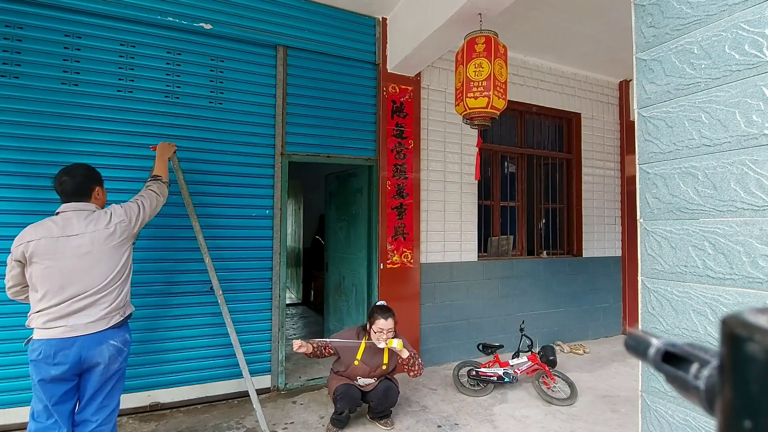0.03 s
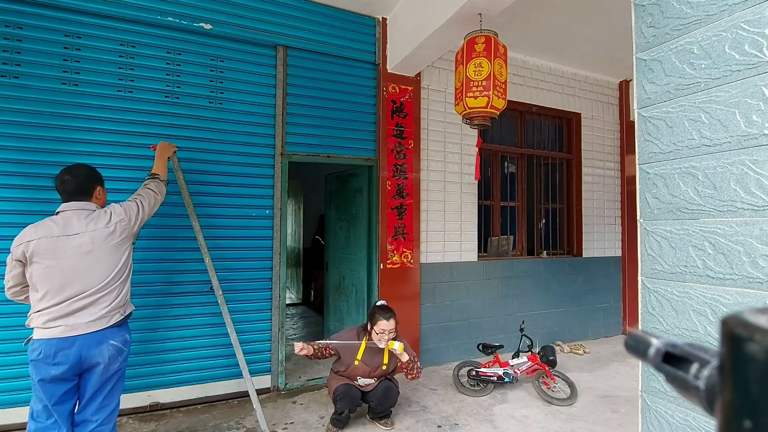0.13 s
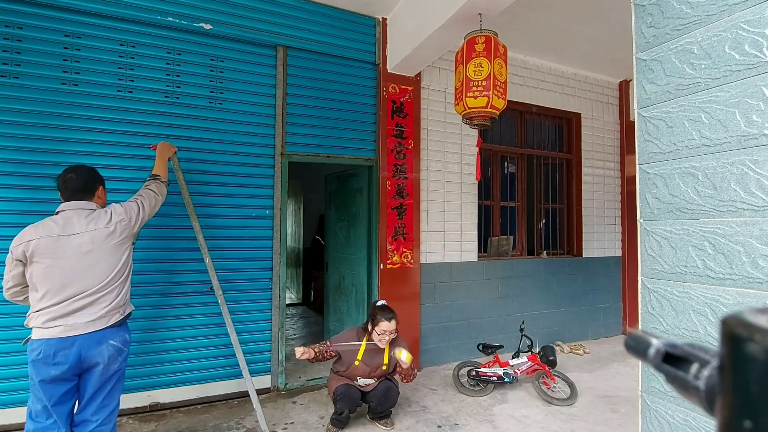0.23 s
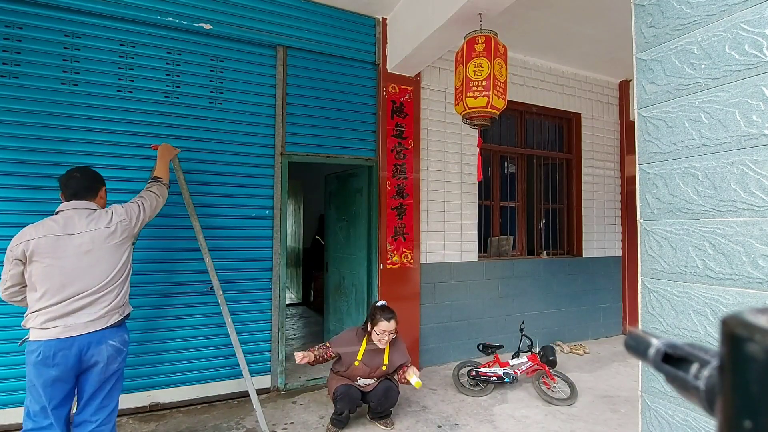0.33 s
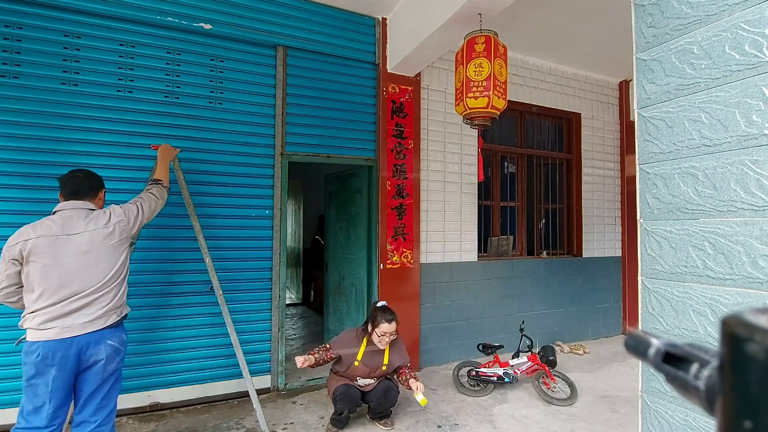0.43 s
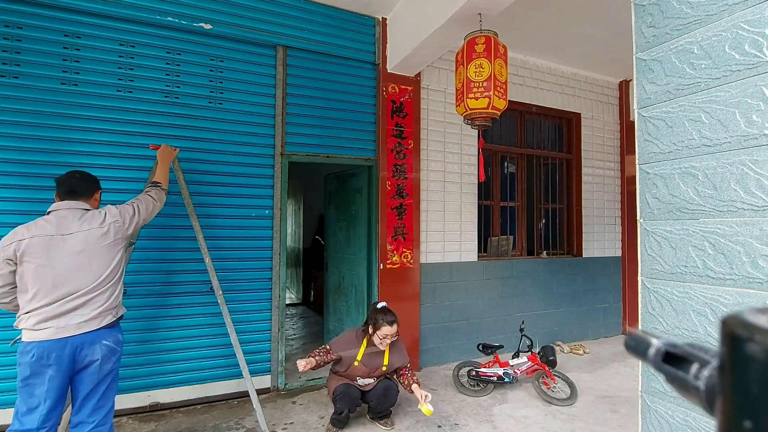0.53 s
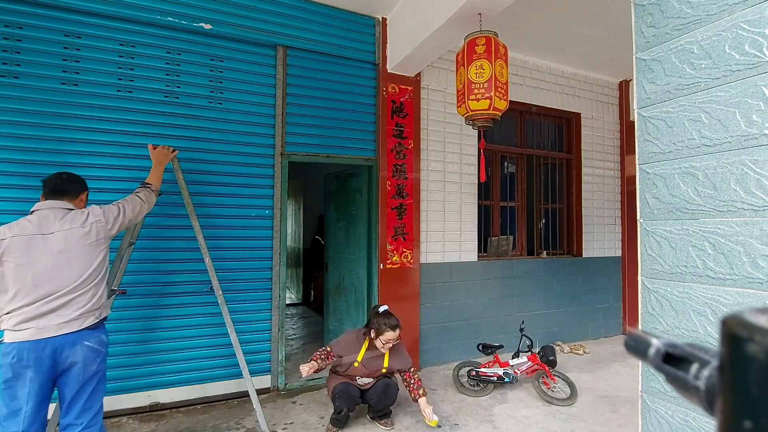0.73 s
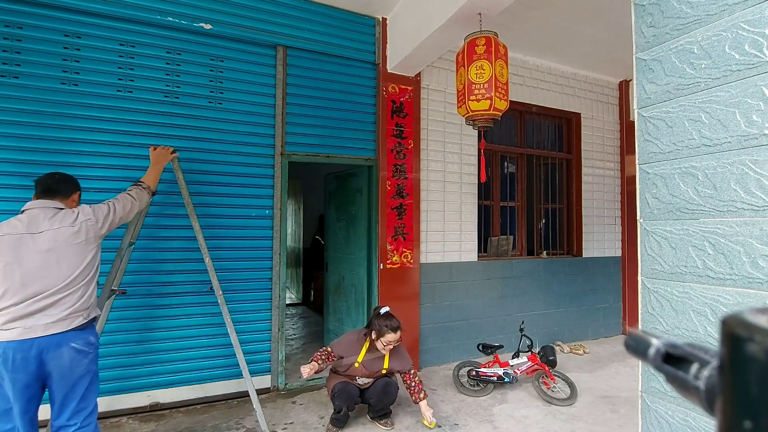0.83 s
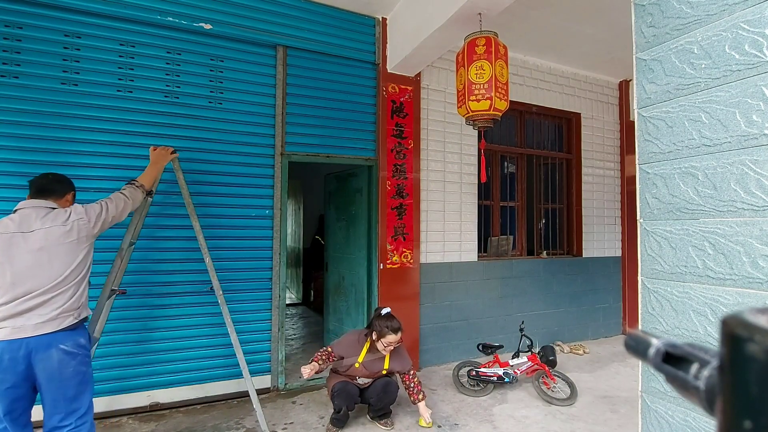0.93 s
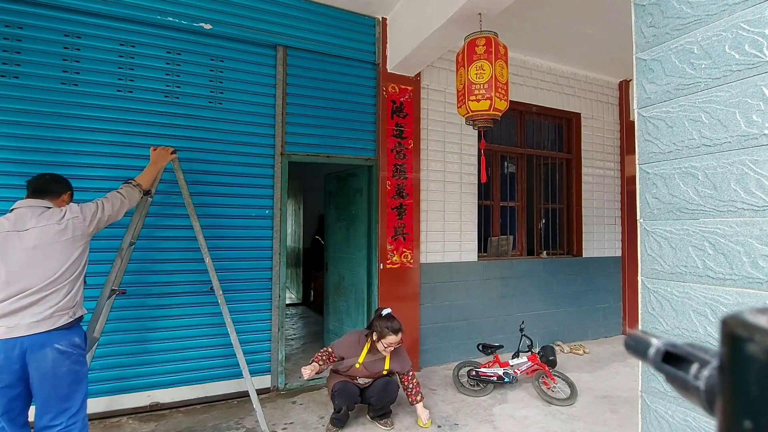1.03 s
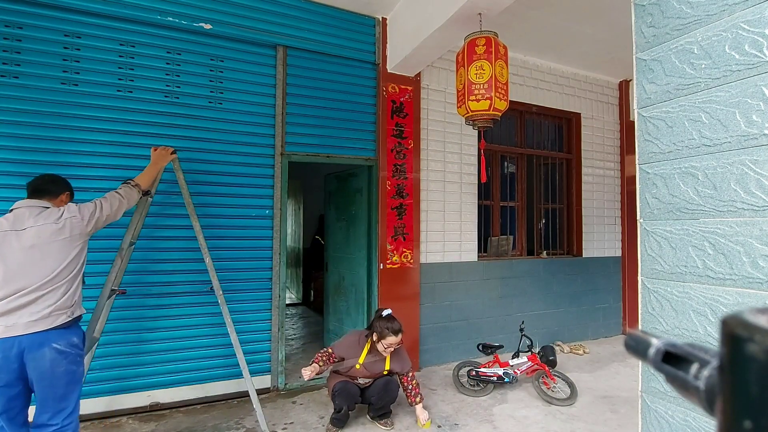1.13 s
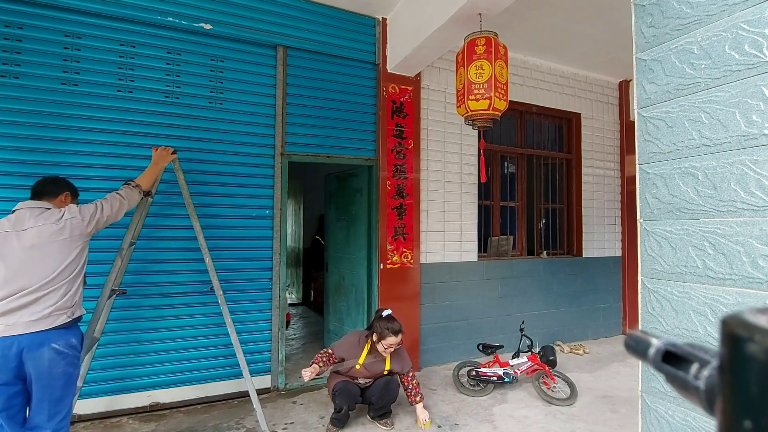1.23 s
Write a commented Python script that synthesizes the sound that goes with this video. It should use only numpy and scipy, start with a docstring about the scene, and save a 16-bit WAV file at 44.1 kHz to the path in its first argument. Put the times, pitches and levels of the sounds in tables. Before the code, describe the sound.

An aluminium stepladder is set up against a metal roller shutter: a light rattle, a tight run of hard clacks, another loud clatter, then a thud, squeak and ticks, picked up in stereo under a reverberant porch.

```python
"""Stepladder against a shutter, under a porch

An aluminium stepladder is spread open in front of a corrugated metal shutter, heard at two spaced ports.
Showers of small contacts make frame and slats rattle and ring; the joints clack hard as noise cracks
over decaying modes. Hinges tick with a high ping, feet land as low filtered noise, a deep boom swells
and a joint squeaks. The porch walls answer with scatter and a noise tail, over a faint outdoor background."""
import sys
import numpy as np
from scipy import signal
from scipy.fft import rfft, irfft
from scipy.io import wavfile

SR = 44100
rng = np.random.default_rng(int(sys.argv[2]) if len(sys.argv) > 2 else 0)


def master(y):
    """Save y as 16-bit WAV."""
    cut = np.clip(np.atleast_2d(y).T, -1, 1)
    pcm = np.round(cut * 32767)  # scale
    wavfile.write(sys.argv[1], SR, pcm.astype(np.int16))


N = 57330  # samples, 1.3 s


def amp(db):
    """Decibels to gain."""
    return 10 ** (np.asarray(db) / 20)


def unit(x):
    """Scale to unit total energy, averaged over the channels."""
    return x / np.sqrt(np.mean(np.sum(x ** 2, axis=-1)))


def on_log(points, hz):
    """Read (Hz, value) points on a log-frequency axis."""
    f, v = np.array(points, float).T
    return np.interp(np.log(np.maximum(hz, 1)), np.log(f), v)


def through(x, response):
    """Pass a signal through an impulse response."""
    return signal.fftconvolve(np.atleast_2d(x), np.atleast_2d(response), axes=-1)[:, :N]


def colour(x, points, size=2048):
    """Causal, minimum-phase filter with the given (Hz, dB) shape."""
    hz = np.arange(size // 2 + 1) * SR / size
    cepstrum = irfft(np.log(amp(on_log(points, hz))))
    # Folding the cepstrum onto its first half puts the energy as early as possible
    cepstrum[1:size // 2] *= 2
    cepstrum[size // 2 + 1:] = 0
    return through(x, irfft(np.exp(rfft(cepstrum))))


def swell(at, rise, decay):
    """Straight rise, exponential fall."""
    t = np.arange(N) / SR - at
    attack = np.clip(t / max(rise, 1 / SR), 0, 1)
    return attack * np.exp(-np.maximum(t - rise, 0) / decay)


def burst(at, decay, rise=0):
    """A puff of contact noise."""
    return rng.standard_normal(N) * swell(at, rise, decay)


CONTACTS_PER_S, CONTACT_SPREAD_DB = 1500, 4  # average rate and level spread, at each port


def shower(at, rise, decay):
    """Dense, uneven little contacts that swell and die away."""
    present = rng.random((2, N)) < CONTACTS_PER_S / SR
    hits = present * np.sign(rng.standard_normal((2, N)))
    strength = amp(CONTACT_SPREAD_DB * rng.standard_normal((2, N)))
    return hits * strength * swell(at, rise, decay)


def modes(table, at=0, detune=0):
    """Decaying partials struck at a time; each reaches the two ports with its own phase."""
    t = np.maximum(np.arange(N) / SR - at, 0)
    out = np.zeros((2, N))
    for hz, db, t60 in table:
        struck_hz = hz * (1 + detune * rng.standard_normal())
        # The phases at the two ports differ more in the treble
        phase = rng.random() + min(hz / 6000, .5) * rng.random((2, 1))
        partial = np.sin(2 * np.pi * (struck_hz * t + phase))
        out += amp(db) * partial * np.exp(-np.log(1000) * t / t60) * (t > 0)
    return unit(out)


PORT_SPACING_M = 0.2


def diffuse():
    """Sound from all around at two spaced ports: alike in the bass, unrelated in the treble."""
    hz = np.arange(N // 2 + 1) * SR / N
    alike = .97 * np.sinc(2 * hz * PORT_SPACING_M / 343)  # 343 m/s, speed of sound
    spectra = rfft(rng.standard_normal((2, N)))
    mid, side = irfft(spectra * np.sqrt([1 + alike, 1 - alike]), N)
    return np.array([mid + side, mid - side])


# Colour of the air outside the porch. Each row: frequency in Hz, level in dB.
AIR = [(20, -33), (35, -7), (55, -9.5), (130, -5.5), (220, -13), (450, 1), (750, -9), (1500, 1.5),
       (3200, -13), (12500, -18.5), (16000, -22)]
AIR_DB = -60


def outdoor_air():
    """A faint, steady outdoor background: coloured noise arriving from all around."""
    return amp(AIR_DB) * np.sqrt(N) * unit(colour(diffuse(), AIR))  # sqrt(N): energy to power


# Rattles of the ladder and the slats. Each row: start in seconds, level in dB, rise in seconds,
# decay in seconds, then treble, ring and low body, all in dB.
RATTLES = [(-.02, -20.5, .015, 0.017, -17.5, -1.5, -19), (0.11, -12.5, 0.0057, 0.088, -23.5, -3, -16),
           (0.396, -5, 0.013, 0.031, 4, -3, -17.5), (0.688, -16.5, 0.017, 0.069, 1, -3, -27),
           (0.766, -17, 0.019, 0.08, -12, -1.5, -43), (0.903, -9, 0.042, 0.031, -2.5, -7, -14),
           (1.266, -28.5, 0.0074, .05, 4, -1, -7.5)]
# Colours of a rattle's clatter and of its treble. Each row: frequency in Hz, level in dB.
CLATTER = [(50, -10.5), (200, -17.5), (600, -9.5), (950, 0), (1300, 3), (1850, 2.5), (2400, -6.5),
           (4000, -20), (16000, -49.5)]
SIZZLE = [(200, -72.5), (1800, -5), (3100, 2), (4200, -2), (5100, -3.5), (7000, -9.5), (10500, -7.5),
          (13000, -12), (16000, -32)]
# Long modes of the ringing metal, low then high, and low modes of the shutter curtain.
# Each row: frequency in Hz, level in dB, time to fall by 60 dB in seconds.
RING = [(762, -9.5, 0.41), (901, -1.5, 0.27), (1096.5, 3.5, 0.21), (1311.7, 2.5, 0.3), (1423, -2, 0.44),
        (1680, -5, 0.51), (1766, -5.5, 0.36)]
HIGH_RING = [(2460, 6, 0.3), (2868, -2, 0.53), (3093, -4.5, 0.29), (3560, 3, 0.2), (3779, 0, 0.5),
             (5010, -1, 0.32), (5090, -2, .17), (5110, 1, .17)]
CURTAIN = [(124, -9.5, 0.14), (305.6, -4, 0.45), (349, -6.5, 0.19), (401.5, -5.5, 0.23), (440, -6.5, 0.48),
           (548.5, -3.5, .5), (655, 0.5, 0.7)]
HIGH_RING_DB = -7.5  # added to the row's ring level


def rattles():
    """Showers of small contacts clatter, keep the metal ringing and shake the shutter curtain."""
    out = np.zeros((2, N))
    for at, db, rise, decay, treble_db, ring_db, body_db in RATTLES:
        contacts = shower(at, rise, decay)
        low_ring = unit(through(contacts, modes(RING)))
        middle = unit(colour(contacts, CLATTER)) + amp(ring_db) * low_ring
        high_ring = unit(through(contacts, modes(HIGH_RING)))
        treble = unit(colour(contacts, SIZZLE)) + amp(ring_db + HIGH_RING_DB) * high_ring
        body = unit(through(contacts[0], modes(CURTAIN)))
        out += amp(db) * (middle + amp(treble_db) * treble + amp(body_db) * body)
    return out


# Dull thuds of feet and ladder shoes. Each row: start in seconds, level in dB, rise in seconds,
# decay in seconds.
THUDS = [(-.01, -25.5, 0.012, 0.077), (.185, -22, 0.021, 0.038), (0.286, -21.5, 0.012, 0.083),
         (0.686, -18.5, 0.014, 0.049), (.83, -41, 0.014, 0.1)]
# Colour of a thud. Each row: frequency in Hz, level in dB.
THUD = [(25, -31), (40, -2), (55, -5), (85, -4.5), (140, 3), (210, -10), (325, 2), (500, -14),
        (1500, -58.5), (16000, -70)]


def thuds():
    """Soft, heavy contacts: low-coloured noise that booms briefly."""
    return sum(amp(db) * unit(colour(burst(at, decay, rise), THUD)) for at, db, rise, decay in THUDS)


# Porch reverberation. Each row: band centre in Hz, time to fall by 60 dB in seconds.
PORCH_T60 = [(150, .7), (530, 0.48), (1400, 0.57), (3700, 0.43), (9700, 0.37), (15000, 0.41)]
PORCH_DB, PORCH_GAP_S, PORCH_BUILD_S = -2.5, 0.001, 0.0064
NEAR_DB, NEAR_GAP_S, NEAR_DECAY_S = -2.5, .0015, 0.0032  # scatter off the shutter and the ground


def porch(x):
    """Quick scatter from near surfaces, then a noise tail with its own decay in each band."""
    t = np.arange(N) / SR
    hz = np.arange(N // 2 + 1) * SR / N
    noise = rfft(diffuse())
    tail = 0
    for centre, t60 in PORCH_T60:
        # Each band fades into its neighbours
        band = on_log([(f, f == centre) for f, _ in PORCH_T60], hz)
        tail = tail + irfft(noise * band, N) * np.exp(-np.log(1000) * t / t60)
    tail = unit(tail * np.clip((t - PORCH_GAP_S) / PORCH_BUILD_S, 0, 1))
    near = unit(diffuse() * swell(NEAR_GAP_S, 0, NEAR_DECAY_S))
    return through(x, amp(NEAR_DB) * near + amp(PORCH_DB) * tail)


# Light hinge ticks. Each row: start in seconds, level in dB, ping in Hz, plain crack in dB,
# decay in seconds, chatter in dB.
TICKS = [(0.193, -39, 11300, 1.5, 0.0067, 10), (0.623, -28, 12800, -5, 0.017, 6),
         (0.7086, -16, 12700, -7.5, 0.00081, -13), (0.7098, -31, 13000, 6, .0007, -12),
         (0.8144, -19.5, 11900, -21, 0.00028, 4.5), (0.8485, -19.5, 10400, 2, 0.0025, 2),
         (0.9297, -12, 11200, -11, 0.0033, 0), (0.943, -17, 11300, -3, 0.013, -17),
         (1.2073, -14, 11260, -12.5, 0.00054, -2)]
# Colour of a metal crack, in ticks and clacks. Each row: frequency in Hz, level in dB.
CRACK = [(60, -28), (300, -10.5), (800, -12), (2000, -6.5), (4000, 2.5), (7000, 1), (10500, 6),
         (13000, 3.5), (16000, -6)]
PING_WIDTH_HZ, TICK_CHATTER_S = 1630, 0.042  # resonance width, chatter decay


def ticks():
    """A hinge slips: a tiny crack with a high ping, then a brief chatter."""
    out = np.zeros((2, N))
    t = np.arange(N) / SR
    for at, db, hz, crack_db, decay, chatter_db in TICKS:
        resonance = np.sin(2 * np.pi * hz * t) * np.exp(-np.pi * PING_WIDTH_HZ * t)
        ping = unit(through(burst(at, decay), resonance))
        crack = unit(colour(burst(at, decay), CRACK))
        chatter = unit(colour(shower(at, 0, TICK_CHATTER_S), CRACK))
        out += amp(db) * (ping + amp(crack_db) * crack + amp(chatter_db) * chatter)
    return out


PORT_LAG_S = .000022  # a crack reaches the right port slightly later


def off_centre(x):
    """Delay the right channel by the lag between the ports."""
    hz = np.arange(N // 2 + 1) * SR / N
    lags = np.array([[0], [PORT_LAG_S]])
    return irfft(rfft(x) * np.exp(-2j * np.pi * hz * lags), N)


# Hard clacks of the ladder's joints. Each row: start in seconds, crack in dB, ring of the rails in dB,
# low ring of the frame in dB, chatter in dB, centre of the rail ring in Hz.
CLACKS = [(0.2377, -2, -5.5, -18, -6.5, 4130), (0.273, -2, -2.5, -13.5, 0.5, 3000),
          (0.2775, 1.5, 1, -3.5, -4.5, 2500), (0.2814, -2, -0.5, -7, -3, 2550),
          (.2856, -3, -15, -15.5, -4, 3000), (0.2935, -1.5, -8, -18, -6, 10500)]
# Short modes of the rails. Each row: frequency in Hz, level in dB, time to fall by 60 dB in seconds.
RAILS = [(1890, -7.5, 0.028), (2470, -5, 0.037), (2747, 1, 0.027), (3624, 4.5, 0.017), (3894, 0.5, 0.037),
         (4131, 0, 0.046), (4350, 2.5, 0.048), (4885, -2, 0.058), (5640, -4, 0.025), (6170, 5, 0.027),
         (7610, 1, 0.033), (9290, 5.5, 0.077), (9940, -1, 0.02), (11900, 3, 0.036)]
CRACK_S, CHATTER_S = 0.00037, 0.026  # decays
RAIL_DETUNE = 0.0091  # random spread of each mode, as a fraction of its frequency
RAIL_FALL_DB_PER_OCTAVE = 6  # the place of the blow favours the modes near its centre
CLACK_RING_DB = -19  # long ring, relative to the rails


def clacks():
    """Metal meets metal: a crack, chatter of the loose joint, the short ring of the rails, a faint long ring."""
    out = np.zeros((2, N))
    for at, crack_db, rail_db, _, chatter_db, centre_hz in CLACKS:
        rails = []
        for hz, db, t60 in RAILS:
            octaves_away = abs(np.log2(hz / centre_hz))
            rails.append((hz, db - RAIL_FALL_DB_PER_OCTAVE * octaves_away, t60))
        crack = off_centre(unit(colour(burst(at, CRACK_S), CRACK)))
        chatter = unit(colour(shower(at, 0, CHATTER_S), CRACK))
        ring = modes(rails, at, RAIL_DETUNE) + amp(CLACK_RING_DB) * modes(RING, at)
        out += amp(crack_db) * crack + amp(chatter_db) * chatter + amp(rail_db) * ring
    return out


# Low modes of the whole frame. Each row: frequency in Hz, level in dB, time to fall by 60 dB in seconds.
FRAME = [(560, -12, 0.036), (765, 4, 0.069), (789, -3.5, .04), (1032, -3.5, 0.035)]
FRAME_DETUNE = .004  # random spread, as a fraction of frequency


def frame():
    """Each clack knocks the whole frame into a short, hollow ring."""
    return sum(amp(db) * modes(FRAME, at, FRAME_DETUNE) for at, _, _, db, _, _ in CLACKS)


# The floor booms after the heaviest thud. One row: time of its height in seconds, level in dB,
# half-width in seconds, frequency in Hz.
BOOM = (.75, -22, .028, 53)


def boom():
    """A few deep cycles under the landing, swelling and fading as a bell curve."""
    at, db, half_width, hz = BOOM
    t = np.arange(N) / SR
    tone = np.sin(2 * np.pi * (hz * t + rng.random()))
    return amp(db) * unit(tone * np.exp(-((t - at) / half_width) ** 2))


# A joint rubs with a brief squeak. One row: start in seconds, level in dB, rise in seconds,
# decay in seconds, frequency in Hz, width in Hz.
SQUEAK = (.778, -20, .025, .007, 1895, 70)


def squeak():
    """Stick and slip in a joint, as a shower of contacts, drive one narrow resonance."""
    at, db, rise, decay, hz, width_hz = SQUEAK
    t60 = np.log(1000) / np.pi / width_hz  # a narrower resonance rings longer
    return amp(db) * unit(through(shower(at, rise, decay), modes([(hz, 0, t60)])))


FRAME_ROOM_DB, THUD_ROOM_DB = -5, -4  # how much of the frame's low ring and of the thuds reaches the walls


def scene():
    """Ladder and shutter under the porch, over the outdoor air."""
    air = outdoor_air()
    metal = rattles() + ticks() + clacks() + squeak()
    knock = frame()
    low = thuds()
    to_walls = metal + amp(FRAME_ROOM_DB) * knock + amp(THUD_ROOM_DB) * low
    return metal + knock + low + boom() + porch(to_walls) + air


TOP_HZ = 15600


def record(dry):
    """The recorder cuts the deepest rumble, below 40 Hz, and the top."""
    rumble_cut = signal.butter(4, 40, "high", fs=SR, output="sos")
    top_cut = signal.ellip(10, .2, 70, TOP_HZ, fs=SR, output="sos")  # 0.2 dB ripple, 70 dB stop
    return signal.sosfilt(top_cut, signal.sosfilt(rumble_cut, dry))


dry = scene()
out = record(dry)
master(out)
```